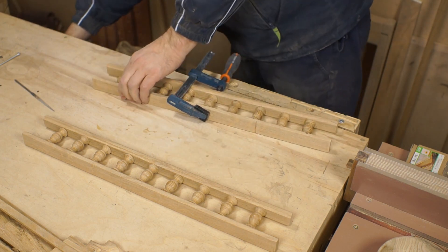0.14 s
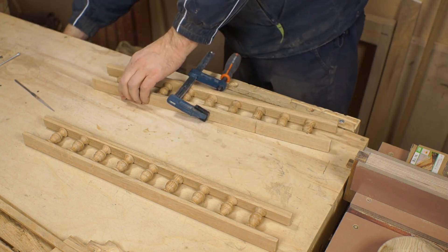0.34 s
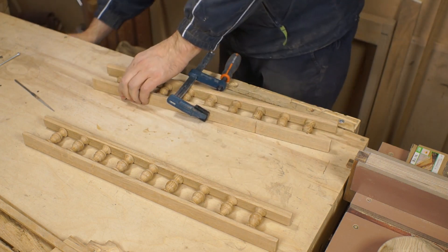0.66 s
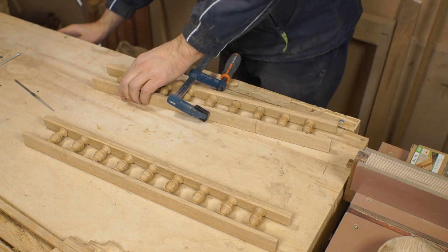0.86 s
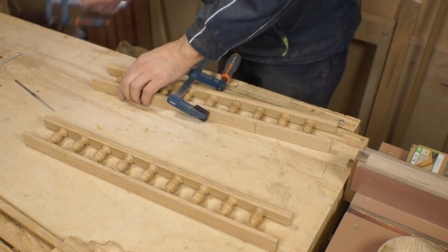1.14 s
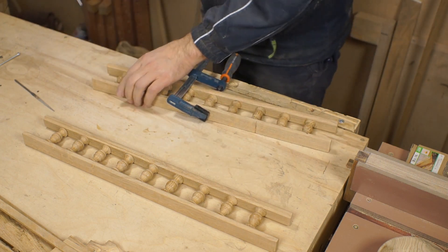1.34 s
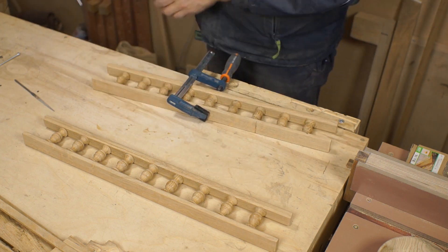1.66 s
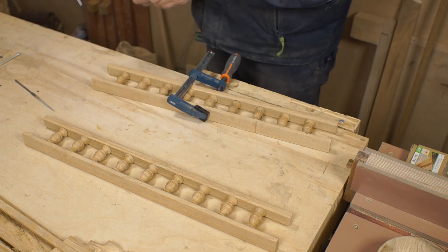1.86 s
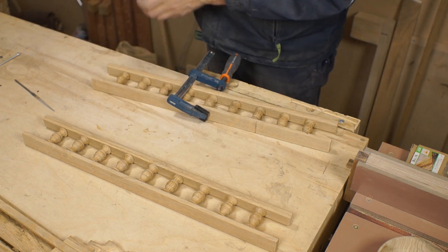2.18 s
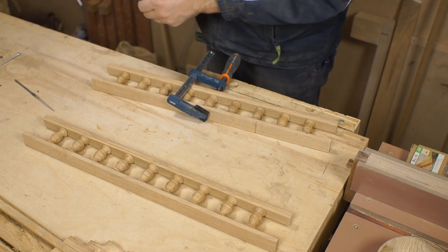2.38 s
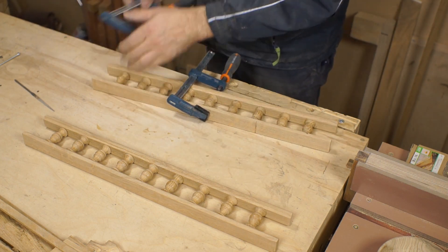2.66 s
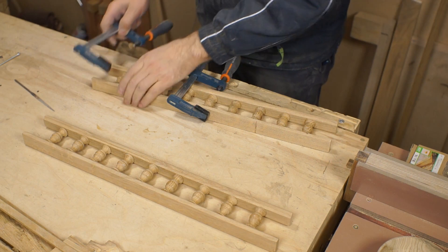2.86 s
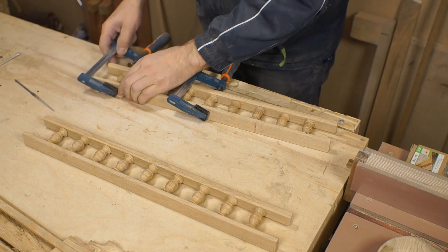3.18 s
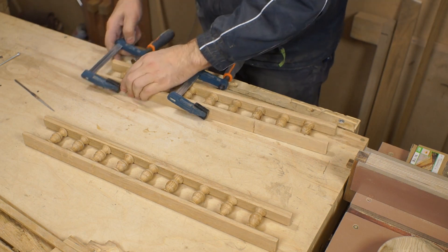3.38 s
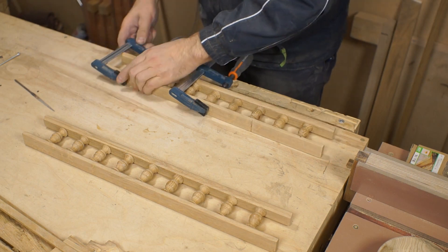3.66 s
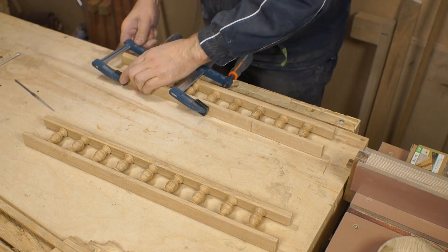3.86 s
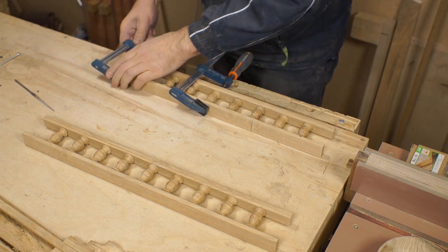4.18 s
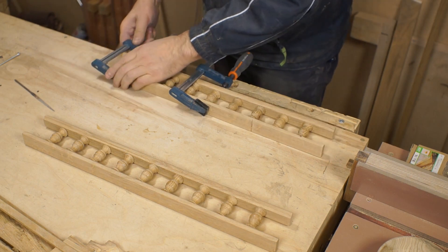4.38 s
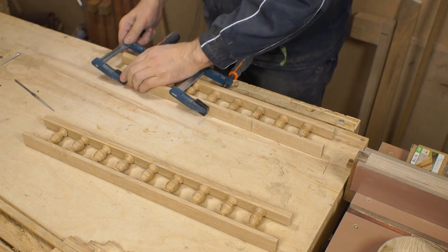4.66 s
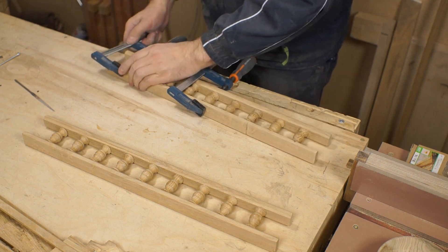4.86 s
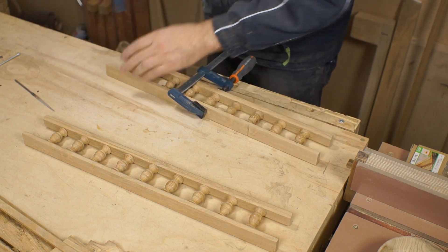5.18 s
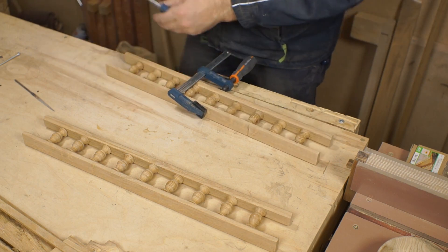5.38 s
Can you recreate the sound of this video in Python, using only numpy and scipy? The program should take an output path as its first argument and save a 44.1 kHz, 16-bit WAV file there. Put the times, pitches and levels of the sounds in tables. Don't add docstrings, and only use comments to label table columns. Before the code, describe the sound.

Wooden rails knock and scrape on a workbench, a steel bar chimes briefly, then a clamp clicks, rattles and tightens in a small quiet workshop.

```python
import sys
import numpy as np
from scipy import signal
from scipy.fft import rfft, irfft, next_fast_len
from scipy.io import wavfile
from scipy.ndimage import uniform_filter1d

SR = 44100
rng = np.random.default_rng(int(sys.argv[2]) if len(sys.argv) > 2 else 0)


def decibels_to_gain(level_db):
    exponent = np.asarray(level_db, float) / 20
    return 10 ** exponent


def persist_wave(psi):
    counts = np.round(np.clip(psi, -1, 1) * 32767).astype(np.int16)
    wavfile.write(sys.argv[1], SR, np.atleast_2d(counts).T)


N = 243873


def evened(x):
    return x / np.sqrt(np.mean(x ** 2) + 1e-20)


def read(points, hz):
    f, value = np.transpose(points)
    return np.interp(np.log(hz + 1), np.log(f + 1), value)


def add(mix, start_s, sound):
    part = mix[round(start_s * SR):][:len(sound)]
    part += sound[:len(part)]


def excite(source, body):
    return evened(signal.oaconvolve(source, body)[:N])


def highpass(x, hz):
    return signal.sosfilt(signal.butter(2, hz, "highpass", fs=SR, output="sos"), x)


def ring(modes, factor=0.86, spread_db=0., rise_s=0.00031, detune=0., waver=0.):
    hz, db, t60_s = np.transpose(modes)[:, :, None]
    t60_s = t60_s * max(factor, .1)
    t = np.arange(round(min(t60_s.max(), .25) * SR)) / SR
    luck = rng.standard_normal((2, len(modes), 1))
    phase = 2 * np.pi * hz * (1 + detune * luck[0]) * t
    alternating = (-1.) ** np.arange(len(modes))[:, None]
    sign = np.sign(luck[0]) if spread_db else alternating
    waves = np.sin(phase) * sign
    if waver:
        push_s = np.linspace(0, .25, 40)
        pushes = rng.standard_normal((2, len(modes), 40))
        a, b = ([np.interp(t, push_s, row) for row in part] for part in pushes)
        waves = waves + waver * (a * np.sin(phase) + b * np.cos(phase))
    out = (decibels_to_gain(db + spread_db * luck[1] - 60 * t / t60_s) * waves).sum(0)
    out = out * (1 - np.exp(-t / rise_s)) * np.minimum(10 * (1 - t / t[-1]), 1)
    return out / abs(out).max()


def burst(modes, contact_s):
    t = np.arange(2500) / SR
    crush = rng.standard_normal(len(t)) * np.exp(-t / max(contact_s, .0005)) * (1 - np.exp(-t / .0005))
    crush = crush * np.minimum(10 * (1 - t / t[-1]), 1)
    out = np.convolve(crush, ring(modes, rise_s=.0001))
    return out / abs(out).max()


def grit(per_s, uneven_db):
    size = decibels_to_gain(uneven_db * np.minimum(rng.exponential(1, N), 4)) * rng.choice([-1, 1], N)
    return size * (rng.random(N) < per_s / SR)


def strokes(rows, edges_db_per_s, lean=0.):
    t = np.arange(0, N + 64, 64) / SR
    rise_db_per_s, fall_db_per_s = edges_db_per_s
    power = 0
    for start_s, length_s, db, drift_db, *colour_db in rows:
        held_db = db + drift_db * np.clip((t - start_s) / length_s, 0, 1) + lean * sum(colour_db)
        before_db = np.maximum(rise_db_per_s * (start_s - t), 0)
        after_db = np.maximum(fall_db_per_s * (t - start_s - length_s), 0)
        power = power + decibels_to_gain(held_db - before_db - after_db) ** 2
    return np.interp(np.arange(N) / SR, t, np.sqrt(power))


# (frequency [Hz], likeness [0-1])
NOISE_SAME = [(30, 1), (300, 0.88), (1000, 0.77), (4000, 0.92), (12000, 1)]


def hiss(spectrum, patchy_db, flicker_db):
    frames, hz = N // 256 + 5, np.fft.rfftfreq(1024, 1 / SR)
    a, b, c, d, patches = rng.standard_normal((frames, 513, 5)).T
    patches = uniform_filter1d(patches, size=12, axis=0)
    patches = evened(uniform_filter1d(patches, size=10, axis=1))
    same = np.clip(read(NOISE_SAME, hz), -1, 1)[:, None]
    left = a + 1j * b
    z = np.array([left, same * left + np.sqrt(1 - same ** 2) * (c + 1j * d)])
    flicker = flicker_db * rng.standard_normal(frames)
    z *= decibels_to_gain(read(spectrum, hz)[:, None] + patchy_db * patches + flicker)
    return evened(signal.istft(z, nperseg=1024, noverlap=768)[1][:, :N])


# (time [s], top thump [dB], rails re thump [dB], small wood re thump [dB], ring factor [1])
FAR_KNOCKS = [(0.082, -55, 1.5, -2, 5), (0.128, -59, -17, 6, 1.5), (0.137, -27.5, -10.5, -10, 1.7),
              (0.302, -46, -6.5, 3.5, 5.4), (0.367, -40, -14, -11, 1.7), (0.453, -37.5, -12.5, -5, 3.4),
              (0.61, -43, 1, -25, 0.25), (0.738, -59, -20, 20, 0.96), (0.756, -48, 11, 17, 0.75),
              (0.822, -43, 16, 8.5, 1.06), (0.843, -43, 7, 4, 1.2), (0.919, -38, 10, 3.5, 0.78),
              (0.975, -50.5, 7, 14.5, 0.53), (1.146, -36.5, 1.5, -3.5, 1.75)]
NEAR_KNOCKS = [(2.906, -58, -28, -31, 1.9), (3.028, -60, -12, 3.5, 0.51), (3.172, -41, 4, 1, 0.93),
               (3.194, -45.5, -1, 5.5, 2), (3.273, -42, -4, -5, 1.2), (3.392, -58.5, 19, 9, 1.8),
               (3.453, -59.5, 10, -10, 3.7), (3.596, -41, -3, -18, 1.1), (3.71, -47.5, 4.5, 3.5, 1.6),
               (3.807, -52, 6, 8.5, 2.3), (3.849, -41.5, -0.5, -10, 1.1), (4.456, -64.5, 1, -5, 1.8),
               (4.552, -32.5, -2, -13.5, 0.62), (4.566, -41, 3, 0, 1.14), (4.865, -62, 10, -14, 1),
               (4.94, -31.5, -2.5, -9, 0.96), (4.967, -43, 9.5, 3.5, 0.68)]
# (frequency [Hz], level [dB], t60 [s])
FAR_TOP = [(133, -11, 0.17), (166.7, 8.5, 0.08), (201.6, 4.5, 0.094), (234, 0.5, 0.034)]
NEAR_TOP = [(153.2, 12, 0.19), (187, 4.5, 0.008), (212, -14, 0.13)]
FAR_RAILS = [(248.3, -0.5, 0.081), (293.4, -3.5, 0.11), (365.4, -1.5, 0.13), (424.7, -10, 0.17)]
NEAR_RAILS = [(248.8, 3.5, 0.081), (294, 2.5, 0.079), (361.3, 4, 0.098), (412, -9, 0.27)]
SMALL_WOOD = [(492.6, 3, 0.068), (546.2, 1, 0.085), (614.4, -1, 0.097), (705.4, -4.5, 0.1), (783, -9, 0.08),
              (896.6, -3, 0.06), (993, -7, 0.05), (1080, -9, 0.045), (1170, -8, 0.04), (1290, -11, 0.035),
              (1440, -13, 0.028)]
TICK_DB = [-12, -19.5]
# (frequency [Hz], level [dB], t60 [s])
TICK_BODY = [(1310, 11.5, 0.0017), (2040, -36, 0.00068), (2800, 2.5, 0.00071)]
# (time [s], level [dB])
CLACKS = [(0.302, -39.5), (0.61, -34), (0.756, -34.5), (0.737, -48.5), (0.915, -44), (0.98, -64),
          (1.143, -42)]


def knocks():
    out = np.zeros(N)
    places = ((FAR_KNOCKS, FAR_TOP, FAR_RAILS, TICK_DB[0]), (NEAR_KNOCKS, NEAR_TOP, NEAR_RAILS, TICK_DB[1]))
    for rows, top, rails, tick_db in places:
        for s, db, rails_db, small_db, factor in rows:
            thump = ring(top, min(factor, 1), rise_s=0.00097)
            rail = ring(rails, factor, 2.3, 0.0016, detune=0.029, waver=0.87)
            small = ring(SMALL_WOOD, 1.6 * factor, 1.85, 0.0024, detune=0.0313, waver=2.5)
            add(out, s, decibels_to_gain(db) * thump)
            add(out, s, decibels_to_gain(db + rails_db) * rail)
            add(out, s, decibels_to_gain(db + small_db) * small)
            add(out, s, decibels_to_gain(db + max(0, rails_db, small_db) + tick_db) * burst(TICK_BODY, contact_s=0.022))
    for s, db in CLACKS:
        add(out, s, decibels_to_gain(db) * burst(TICK_BODY, contact_s=0.016))
    return highpass(out, 45)


# (start [s], length [s], pressure [dB], drift [dB], lightness [dB])
DRAG = [(0.17, 0.12, -56.5, -10, 5.5), (0.3, 0.4, -58.5, -5, 0.5), (0.72, 0.26, -63.5, 11.5, 2),
        (1.0, 0.41, -69.5, -12, -0.5), (2.9, 0.17, -94.5, 12, -9), (3.33, 0.26, -66, 11.5, 3),
        (3.63, 0.072, -66, 11.5, -3), (3.77, .13, -64, 3.5, 0.5), (3.95, 0.322, -76.5, -2.5, -1),
        (4.58, 0.14, -74, 0.5, -10), (4.78, 0.21, -61, 0.5, 2), (5.0, 0.13, -60, -7, -4.5),
        (5.26, 0.07, -86, -2, 8)]
# (frequency [Hz], level [dB], t60 [s])
SCRAPE = [(1290, -6, 0.05), (1450, -6, 0.05), (1640, -9, 0.04), (1850, -12, 0.04)]
# (frequency [Hz], level [dB], t60 [s])
LEGS = [(70, -9, 0.33), (83.6, 0, 0.068), (108.6, -15, 0.19)]
LEGS_DB = [2, -9]
# (start [s], length [s], level [dB], drift [dB])
SING = [(3.39, 0.038, -63.5, 4), (3.44, 0.03, -58.5, 5), (3.495, 0.12, -53, -5.5), (3.69, 0.042, -55, -1),
        (3.81, 0.067, -67, 6), (4.78, 0.073, -63, 3), (4.99, 0.081, -60.5, -6.5)]
# (frequency [Hz], level [dB], t60 [s])
SING_MODES = [(880, -3, 0.05), (1180, -3, 0.05), (1420, 0, 0.035), (1560, -4, 0.03)]
# (start [s], length [s], level [dB], drift [dB])
HUM = [(3.45, 0.034, -53, 5), (3.5, 0.11, -50.5, 4), (4.79, 0.11, -56.5, -4)]
# (frequency [Hz], level [dB], t60 [s])
HUM_MODES = [(368, -1, 0.18), (551, -6.5, 0.096)]


def drag():
    edges_db_per_s, moved_s = (410, 580), 2.0
    slips = grit(per_s=700, uneven_db=4.5)
    top = excite(slips, ring(NEAR_TOP, .4))
    rails = excite(slips, ring(NEAR_RAILS, .7))
    small = excite(slips, ring(SMALL_WOOD[:-1] + SCRAPE, .25))
    legs = excite(slips, ring(LEGS, .6))
    top = top + decibels_to_gain(np.where(np.arange(N) < moved_s * SR, *LEGS_DB)) * legs
    sing = strokes(SING, edges_db_per_s) * excite(slips, ring(SING_MODES))
    hum = strokes(HUM, edges_db_per_s) * excite(slips, ring(HUM_MODES))
    out = sing + hum
    for lean, body in ((-1, top), (0, rails), (1, small)):
        out = out + strokes(DRAG, edges_db_per_s, lean) * body
    return out


# (time [s], level [dB], brightness [dB])
LOOSE_CLICKS = [(0.1401, -60.5, 13.5), (0.191, -49.5, 7.5), (0.61, -32.5, -10.5), (0.7587, -29.5, -23),
                (1.939, -43.5, -8), (1.9888, -40, -6.5), (3.182, -45.5, -13), (3.2857, -52.5, -8),
                (4.038, -57.5, -0.5), (4.5507, -53.5, 2), (4.9215, -32.5, -3.5), (5.4173, -42, -1),
                (5.435, -50.5, 12.5), (5.508, -47, -1)]
SLIDING_CLICKS = [(2.1331, -40.5, -13), (2.1491, -28, -7), (2.1538, -35, 9), (2.172, -27, -3),
                  (2.1933, -28, 2.5), (2.1974, -50, 1), (2.2042, -32.5, 7.5), (2.2244, -27.5, -4),
                  (2.2414, -31, 1.5), (2.2593, -36, 10.5), (2.2648, -31, 8), (2.2722, -35.5, 7.5),
                  (2.2822, -29, 7), (2.3056, -39, 14.5), (2.3223, -42, 12), (2.3712, -37, 12),
                  (2.397, -29.5, 6.5), (2.446, -47, 10), (2.4694, -51.5, 16.5), (2.5735, -45.5, -4),
                  (2.6214, -36, -7), (2.6284, -29.5, -5), (2.6349, -38, 6.5), (2.6469, -26.5, -0.5),
                  (2.6903, -35, -4), (2.7275, -40, -2.5)]
TIGHTENING_CLICKS = [(3.5493, -39.5, 0), (3.5732, -43.5, 9), (3.591, -51, 8), (3.6045, -38.5, 11.5),
                     (3.621, -38, 9.5), (3.6545, -45.5, 19), (3.688, -38, 9), (3.701, -34.5, -16),
                     (3.8106, -36, -32), (3.3, -60, -6), (3.541, -50, 7), (3.636, -55, 3), (3.675, -52, 0),
                     (3.682, -49, -6), (3.692, -36, 8), (3.697, -35, 2), (3.706, -44, -11)]
CONTACT_S = [0.0045, 0.003, 0.0013]
TOP_MODES_DB = [-11, -8.5, -16]
# (frequency [Hz], level [dB], t60 [s])
JAW = [
    [(1020, -12.5, 0.0076), (2340, 1, 0.005), (3700, 9, 0.0024)],
    [(5300, 8, 0.00065), (6410, -2.5, 0.0032), (7930, -6, 0.0022)],
    [(9480, -7.5, 0.0061), (10920, 7, 0.00091), (14100, -11, 0.0019)],
]
# (time [s], level [dB])
SNAPS = [(1.1427, -56), (3.8099, -41.5), (4.9241, -36.5), (5.4354, -38.5)]
# (frequency [Hz], level [dB], t60 [s])
SNAP_BODY = [(1800, -3, 0.0011), (3600, 0, 0.002), (6240, 0, 0.001), (10400, -7, 0.0008)]


def clamp_clicks():
    out = np.zeros(N)
    stages = (LOOSE_CLICKS, SLIDING_CLICKS, TIGHTENING_CLICKS)
    for clicks, contact_s, top_db in zip(stages, CONTACT_S, TOP_MODES_DB):
        for s, db, bright_db in clicks:
            for share_db, modes in zip((0, bright_db, bright_db + top_db), JAW):
                add(out, s, decibels_to_gain(db - 4.0 + share_db) * burst(modes, contact_s))
    for s, db in SNAPS:
        add(out, s, decibels_to_gain(db) * burst(SNAP_BODY, contact_s=1 / 800))
    return out


# (start [s], length [s], level [dB], drift [dB])
RATTLE = [(2.17, 0.24, -52, 1.5), (2.63, 0.16, -74.5, 3), (3.52, 0.15, -66.5, 12), (3.66, 0.042, -60, -2)]
RATTLE_MIX_DB = [6, 7, -4]
# (start [s], length [s], level [dB], drift [dB])
SQUEAK = [(4.13, 0.091, -76, -3)]
# (frequency [Hz], level [dB], t60 [s])
SQUEAK_MODE = [(2760, 0, 0.023)]


def clamp_rattle():
    edges_db_per_s = (360, 185)
    chatter = grit(per_s=3000, uneven_db=2.4)
    jaw = 0
    for db, modes in zip(RATTLE_MIX_DB, JAW):
        jaw = jaw + decibels_to_gain(db) * excite(chatter, ring(modes, 0.64, rise_s=.0001))
    squeak = excite(chatter, ring(SQUEAK_MODE)) * strokes(SQUEAK, edges_db_per_s)
    return squeak + evened(jaw) * strokes(RATTLE, edges_db_per_s)


# (time [s], frequency [Hz], level [dB], t60 [s])
RINGS = [(0.144, 7570, -60, 0.4), (0.144, 9500, -61, 0.074), (1.939, 2037, -49.5, 0.28),
         (1.942, 3310, -52.5, 0.083), (1.962, 3280, -57, 0.3), (2.154, 2376, -39, 0.12),
         (2.195, 2340, -39.5, 0.19), (2.398, 12200, -50, .1), (2.633, 2490, -37, 0.1),
         (2.648, 2450, -45.5, 0.21), (2.648, 3620, -53, 0.16), (2.69, 11300, -54, 0.14),
         (3.184, 3610, -67, 0.25), (3.42, 3700, -57, 0.14), (3.657, 3310, -46, 0.11),
         (3.692, 3760, -42, 0.26), (3.688, 10950, -42, 0.077), (3.689, 9660, -46, 0.086),
         (3.605, 11100, -47, 0.039), (3.655, 7840, -57, 0.044), (3.543, 11800, -52, .03),
         (3.557, 11900, -56, .03), (3.536, 14300, -54, .04), (3.811, 3600, -49, 0.17),
         (5.436, 3700, -50, 0.21), (5.435, 6080, -52, 0.15), (5.435, 9220, -40.5, 0.03),
         (5.436, 12900, -51, 0.05)]
# (time [s], frequency [Hz], level [dB], t60 [s])
FRAME_RINGS = [(2.32, 918, -61, 0.13), (2.634, 920, -58, 0.13), (2.636, 2455, -45, 0.25),
               (3.808, 1128, -45, 0.071)]


def clamp():
    out = clamp_clicks() + clamp_rattle()
    for s, hz, db, t60_s in RINGS:
        pair = [(hz, 0, t60_s), (hz * 1.03, -4, t60_s * 0.3)]
        add(out, s, decibels_to_gain(db) * ring(pair, rise_s=0.00013, waver=2.5))
    add(out, .5, decibels_to_gain(-48.5) * ring([(2050, 0, 0.34)], rise_s=0.043, waver=0.61))
    out = highpass(out, 1500)
    for s, hz, db, t60_s in FRAME_RINGS:
        add(out, s, decibels_to_gain(db) * ring([(hz, 0, t60_s)], waver=0.33))
    return out


# (time [s], level [dB], time until a hand stops it [s])
CHIMES = [(.308, -38, 0.17), (0.457, -37.5, 0.1)]
# (frequency [Hz], first strike [dB], second strike [dB], t60 [s])
BAR = [(1598, -3.5, -1.5, 0.8), (2030, -1, -5, 0.32), (5150, -15, -18, 0.26), (2130, -4, -4, 0.96),
       (1480, -8, -12, 0.5), (2913, -9, -11.5, 0.49), (3998, 9.5, -2.5, 0.09), (4137, -3, -3, 0.36),
       (5840, -7, -5.5, 0.49), (7960, -19, -11, 0.42), (6910, 14, 13, 0.073), (8700, -14, -7.5, 0.22),
       (9200, -17, -13, 0.19), (10460, -17, -24, 0.16), (11150, -20, -12, 0.12)]


def bar():
    out = np.zeros(N)
    for k, (s, db, held_s) in enumerate(CHIMES):
        chime = ring(np.array(BAR)[:, [0, 1 + k, 3]], rise_s=.004, waver=.7)
        t = np.arange(len(chime)) / SR
        stop = np.exp(-np.maximum(t - held_s, 0) / 0.0083)
        add(out, s, decibels_to_gain(db) * stop * chime)
    return out


# (start [s], length [s], pressure [dB], drift [dB], fine re coarse [dB])
RUB = [(0.14, 0.13, -62.5, -2, -12), (0.33, 0.2, -59.5, 2.5, -9.5), (0.6, 0.049, -60, 14, -19.5),
       (0.74, 0.13, -68.5, 13.5, -8.5), (0.96, 0.76, -69.5, -5.5, -5.5), (1.76, 0.23, -64, -0.5, -2),
       (2.14, 0.096, -62, 2.5, -2), (2.26, 0.12, -85, -4, 3), (2.365, 0.096, -67, 6, -20),
       (2.37, 0.37, -59.5, -28, 0.5), (2.92, 0.1, -73, 0, -4.5), (3.3, .11, -73.5, -3, -20),
       (3.41, 0.34, -61.5, -1, -6), (3.72, 0.2, -67, -16, -15), (4.025, 0.2, -75, 2.5, -2.5),
       (4.21, 0.11, -87, -16, 9), (4.52, 0.043, -72, 4, -1), (4.77, 0.056, -65, 8, -7),
       (4.925, 0.1, -63.5, 1.5, -11.5), (5.07, 0.066, -73.5, 4, -2), (5.26, 0.12, -63.5, -3, -1.5),
       (5.425, 0.075, -65.5, -2, 2.5)]
# (frequency [Hz], density [dB per Hz])
COARSE = [(500, -5), (900, 1), (2000, 2.5), (3500, -1.5), (5000, -9), (8000, -39)]
FINE = [(3000, -12.5), (5000, -3.5), (7000, -3.5), (10000, -7.5), (13000, -13), (16000, -18)]
RUB_EDGES_DB_PER_S = (247, 226)


def rub():
    coarse = strokes(RUB, RUB_EDGES_DB_PER_S) * hiss(COARSE, patchy_db=1.2, flicker_db=1.0)
    fine = strokes(RUB, RUB_EDGES_DB_PER_S, 0.97) * hiss(FINE, patchy_db=1.2, flicker_db=1.5)
    return coarse + fine


# (frequency [Hz], t60 [s])
SHOP = [(100, 0.11), (500, 0.31), (2000, 0.32), (6000, 0.25), (14000, 0.11)]
# (frequency [Hz], likeness [0-1])
ECHO_SAME = [(100, 0.72), (500, 0.46), (2000, 0.72), (6000, 0.82), (14000, 1)]


def shop(x):
    taps = np.zeros((2, SR // 2))
    at = np.arange(120, SR // 2 - 20, 20) + rng.integers(0, 20, (2, (SR // 2 - 121) // 20))
    np.put_along_axis(taps, at, rng.choice([-1., 1.], at.shape), 1)
    hz, t, z = signal.stft(taps, SR, nperseg=256)
    tail = signal.istft(z * decibels_to_gain(-60 * t / read(SHOP, hz)[:, None]), SR, nperseg=256)[1]
    length = tail.shape[1]
    same = np.clip(read(ECHO_SAME, np.fft.rfftfreq(length, 1 / SR)), -1, 1)
    left, other = rfft(tail)
    pair = irfft(np.array([left, same * left + np.sqrt(1 - same ** 2) * other]), length)
    return signal.fftconvolve(x[None], pair / np.linalg.norm(pair[0]), axes=1)[:, :N]


# (frequency [Hz], density [dB per Hz])
HUSH = [(12, -43), (22, 8), (74, -8), (134, -12.5), (340, -15.5), (420, -21), (2020, -25), (16000, -34)]
# (start [s], length [s], share removed [dB], drift [dB])
DUCKED = [(2.24, 0.2, -1.5, 3)]


def hush():
    kept = 1 - np.minimum(strokes(DUCKED, RUB_EDGES_DB_PER_S), 1)
    return decibels_to_gain(-71.5) * kept * hiss(HUSH, patchy_db=0.97, flicker_db=0.127)


# (frequency [Hz], left over right [dB])
PORTS = [(30, -5), (60, -3.5), (125, -1.5), (300, -0.5), (600, -1), (1200, 0.5), (4000, 0.2), (12000, 0.2)]


def ports(mix):
    gap_s = 3e-6
    size = next_fast_len(N)
    hz = np.fft.rfftfreq(size, 1 / SR)
    lean = decibels_to_gain(read(PORTS, hz) / 2) * np.exp(1j * np.pi * hz * gap_s)
    return irfft(rfft(mix, size) * [lean, 1 / lean], size)[:, :N]


def scene():
    pan_db, room_db = 0.9, -4.5
    near = knocks() + drag() + clamp() + bar()
    direct = near * decibels_to_gain([[pan_db], [-pan_db]])
    return ports(direct + decibels_to_gain(room_db) * shop(near) + rub() + hush())


def band_limit(x):
    return signal.sosfilt(signal.butter(12, 16410, fs=SR, output="sos"), x)


def record(dry):
    lowpass = signal.firwin(511, 16000, window=("kaiser", 9), fs=SR)
    limited = signal.oaconvolve(dry, lowpass[None], "same")
    return band_limit(limited)


dry = scene()
out = record(dry)
persist_wave(out)
```